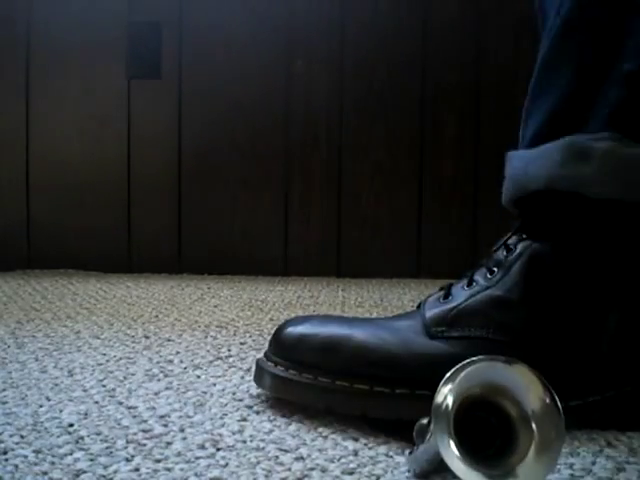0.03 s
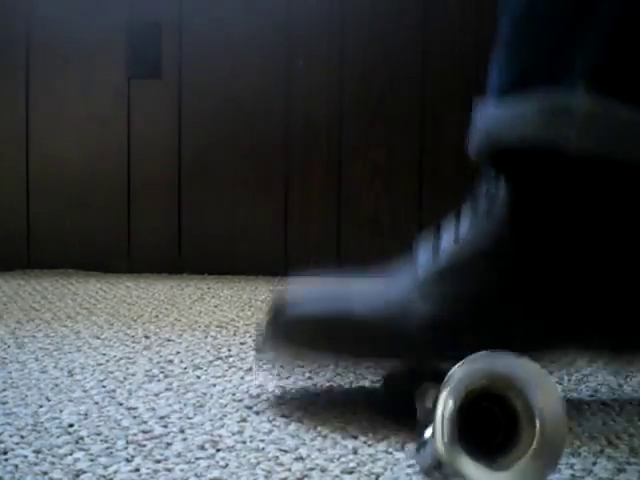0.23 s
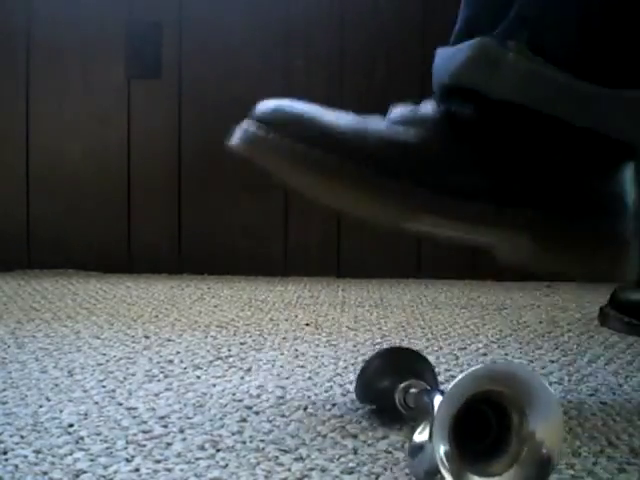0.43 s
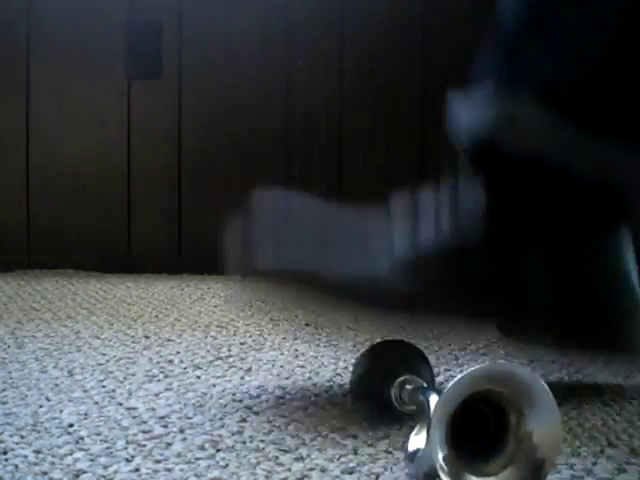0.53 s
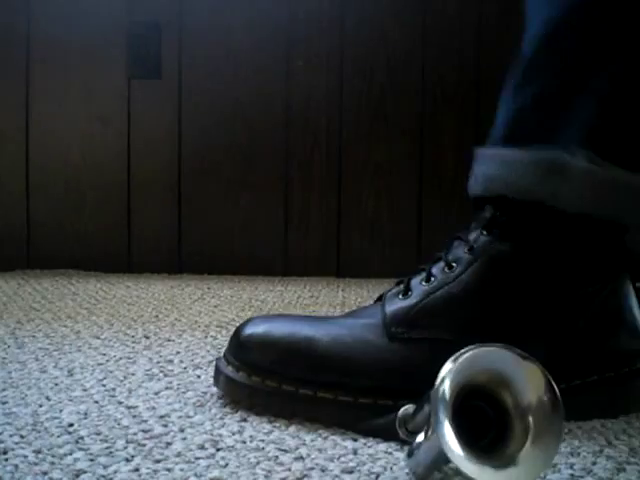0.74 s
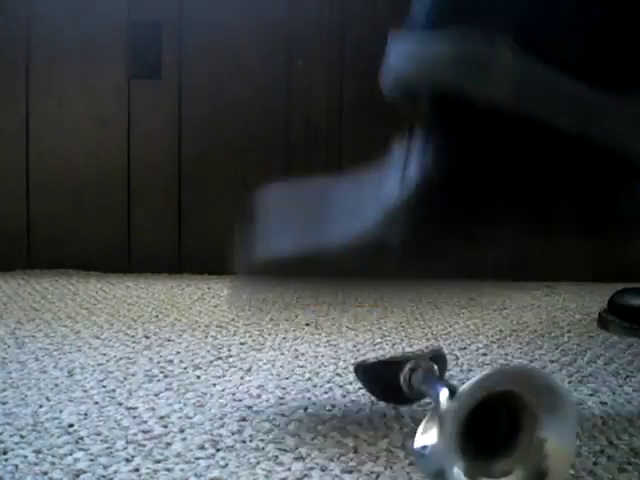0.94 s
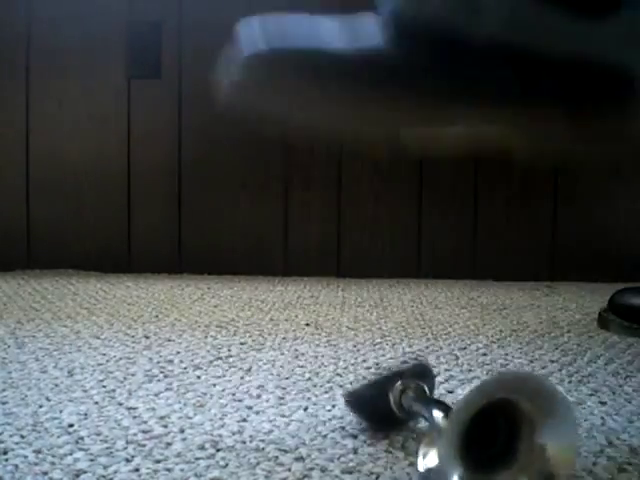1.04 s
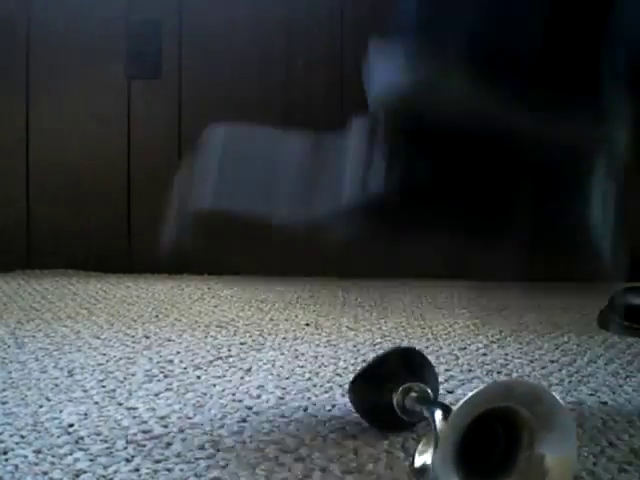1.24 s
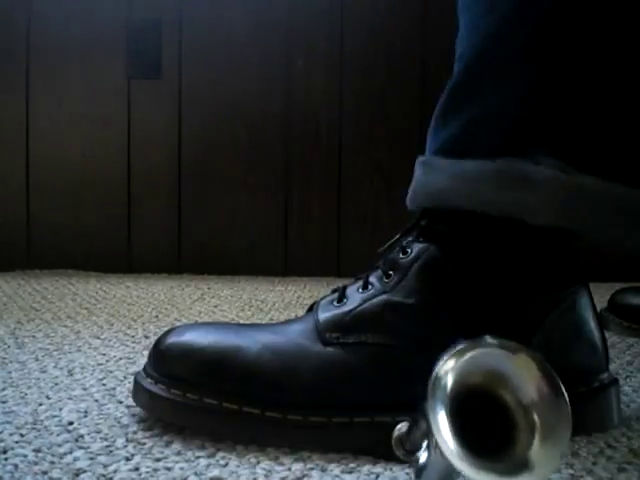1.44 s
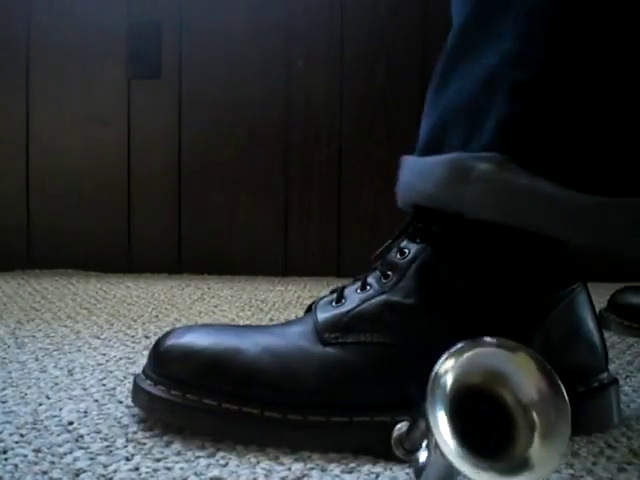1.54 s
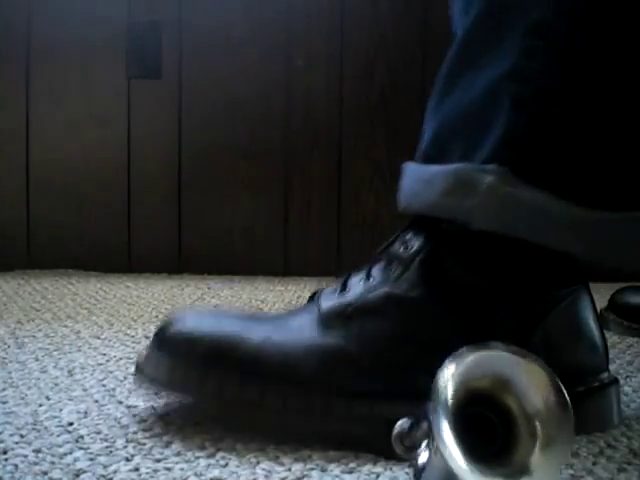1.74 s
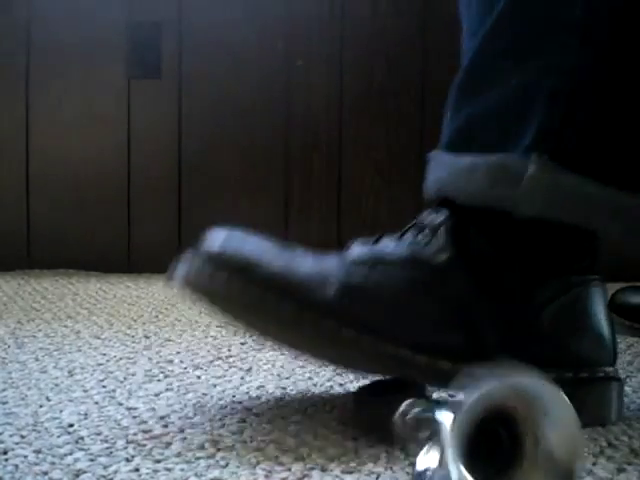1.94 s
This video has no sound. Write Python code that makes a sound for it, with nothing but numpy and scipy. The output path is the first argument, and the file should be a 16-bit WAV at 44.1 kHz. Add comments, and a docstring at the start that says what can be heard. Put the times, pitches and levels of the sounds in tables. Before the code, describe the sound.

Close by in a small room, a bulb horn gives two short honks as a boot lifts off it. Each honk is followed by a soft stamp on carpet and hissing air, the first with a squawk. The boot then knocks twice.

```python
"""A light tap, then a rubber bulb horn honks twice, pumped by a boot on the carpet of a small room.
Each time the boot lifts, the bulb refills and sounds the reed; the honks ring on in the room.
Each of two stamps chokes the reed: a tap, a thump and a hiss of air, the first ending in a squawk.
Trousers rustle, and the boot knocks twice as it settles."""
import sys
import numpy as np
from scipy import signal
from scipy.fft import rfft, irfft
from scipy.io import wavfile

SR = 44100
rng = np.random.default_rng(int(sys.argv[2]) if len(sys.argv) > 2 else 0)


def put_to_file(sound):
    """Save the sound as 16-bit audio at rate SR, in the file named by the first command-line argument."""
    columns = np.atleast_2d(sound).T  # one column per channel
    safe = np.clip(columns, -1, 1)
    whole_steps = np.round(safe * 32767)
    wavfile.write(sys.argv[1], SR, whole_steps.astype(np.int16))


N = 88200
T = np.arange(N) / SR

# reed notes: t/s, f/Hz, fundamental/dB, octave/dB, overtones/dB
FIRST_HONK = [(.222, 600.8, -63, -107, -75), (.243, 627.5, -13, -29, -45.5), (.248, 621.6, -8, -9.5, -23),
              (.253, 574, -18, -6.5, -14.5), (.302, 574.7, -17, -7.5, -13.5), (.315, 567, -23.5, -9, -29),
              (.338, 572.6, -29, -12.5, -33.5), (.358, 562.8, -33.5, -33, -51.5),
              (.41, 578.4, -65, -43.5, -78)]
SECOND_HONK = [(.884, 602.2, -62.5, -88.5, -71), (.901, 671, -17, -28.5, -38),
               (.9055, 623.4, -9, -11, -23.5), (.910, 569.8, -16, -6.5, -15.5), (.930, 577.2, -23, -9, -25),
               (.937, 585.5, -23, -14.5, -32.5), (.946, 565.9, -21, -8, -26.5),
               (.964, 574.5, -29, -20.5, -48.5), (.995, 565, -54, -47, -73)]
SQUAWK_NOTE = [(.605, 607.7, -40.5, -57.5, -53.5), (.619, 610, -23, -53.5, -55),
               (.629, 596, -13, -23.5, -44), (.643, 583.7, -22, -33.5, -27), (.651, 609.1, -11, -15, -54),
               (.657, 634, -11.5, -14, -21.5), (.661, 553.2, -20, -14, -11),
               (.666, 505.5, -31, -20.5, -21.5), (.68, 520, -44, -46, -53.5)]
# overtone envelopes: f/Hz, level/dB
FIRST_COLOUR = [(1720, -1), (2290, -4), (2870, 1.5), (3440, -8.5), (4020, -12.5), (5000, -10.5),
                (6100, -22), (7100, -9.5), (8100, -26), (9200, -19), (17000, -34)]
SECOND_COLOUR = [(1720, -1.5), (2290, 3.5), (3440, -2), (4020, -5.5), (5600, -7), (7400, -25.5),
                 (17000, -44)]
SQUAWK_COLOUR = [(1700, 2.5), (3000, 5.5), (4500, -4.5), (6000, -3), (9000, -29.5), (17000, -34.5)]
# air puffs, low gusts: f/Hz, level/dB
PUFF_SPECTRUM = [(1200, -16), (2000, -4), (5500, 2.5), (8000, -6), (17000, -13)]
GUST_SPECTRUM = [(20, -5.5), (60, -6), (140, -14), (300, -16.5), (700, -11.5), (2000, -66)]
WAVER_HZ, SHIMMER_HZ, SHIMMER_DB, GUST_DB = 350, 70, .55, -27

def reed(note, colour, air_db, jitter):
    """The reed starts sharp and pure, then locks to the pipe and gains overtones; each opening puffs."""
    times, hz, *levels = np.transpose(note)
    pitch_hz = np.interp(T, times, hz) * (1 + jitter * waver(WAVER_HZ))
    phase = 2 * np.pi * np.cumsum(pitch_hz) / SR
    gate = (T > times[0]) * (T < times[-1])
    fundamental, octave, overtones = (amp(np.interp(T, times, db)) * gate for db in levels)
    buzz = 0
    for k in range(3, 32):
        level_db = read(colour, k * np.median(hz)) + SHIMMER_DB * np.sqrt(k) * waver(SHIMMER_HZ)
        buzz += amp(level_db) * np.sin(k * phase + k * k * np.pi / 10)
    tone = np.sqrt(2) * (fundamental * np.sin(phase) + octave * np.sin(2 * phase))
    puffs = amp(air_db) * unit((1 + np.sin(phase)) * noise(PUFF_SPECTRUM))
    gusts = amp(GUST_DB) * np.sqrt(overtones * octave) * noise(GUST_SPECTRUM)
    return tone + overtones * (unit(buzz) + puffs) + gusts


# reed rasps: t/s, half length/s, level/dB
RASPS = [(.252, 0.0015, -21), (.306, 0.0055, -26), (.908, 0.006, -18), (.941, .008, -31),
         (.661, .004, -17.5)]
# reed resonances: f/Hz, level/dB
RASP_SPECTRUM = [(300, -9.5), (800, -1.5), (1500, -6.5), (2000, 13), (2600, -7), (3050, 11), (4000, -5),
                 (5300, 3.5), (8000, -17.5), (18000, -22)]

def rasp(at_s, half_s, db):
    """The reed flutters irregularly as it catches or lets go."""
    return amp(db) * np.exp(-((T - at_s) / half_s) ** 2) * noise(RASP_SPECTRUM)


# faint toots: t/s, half length/s, level/dB
TOOTS = [(1.36, .0051, -35.5), (1.956, .018, -39.5)]

def toot(at_s, half_s, db, hz=595):
    """The bulb shifts; a little air barely sounds the reed."""
    return amp(db) * np.exp(-((T - at_s) / half_s) ** 2) * np.sqrt(2) * np.sin(2 * np.pi * hz * T)


# stamps: t/s, rise/s, hold until/s, release/s, level/dB
HISSES = [(0.589, 0.018, .645, 0.019, -11.5), (1.308, .012, 1.349, 0.022, -11.5)]
# escaping air: f/Hz, level/dB
HISS_SPECTRUM = [(2400, -14), (3200, -4), (4000, -8.5), (5200, -1.5), (7500, -6), (10000, -3.5), (12500, 1),
                 (15000, 0.5), (18000, -7.5)]
SAG_DB_PER_S = 58

def hiss(at_s, rise_s, until_s, release_s, db):
    """Air rushes past the choked reed while the bulb flattens."""
    attack = np.clip((T - at_s) / rise_s, 0, 1) ** .89
    release = np.clip(1 - (T - until_s) / release_s, 0, 1) ** 2
    sag_db = SAG_DB_PER_S * since(at_s + rise_s)
    return amp(db - sag_db) * attack * release * noise(HISS_SPECTRUM)


# sole strikes: t/s, level/dB, f/Hz, decay/s, click/dB
SOLE_KNOCKS = [(.175, -21, 886, 0.0016, -32.5), (0.5772, -23.5, 1020, 0.0024, -21),
               (0.6026, -22.5, 208, 0.0031, -18.5), (1.2982, -20, 1000, 0.0015, -18.5),
               (1.3151, -18, 577, 0.0057, -28), (1.3227, -18.5, 258.4, 0.0042, -29),
               (1.685, -35, 914, 0.0013, -44), (1.8162, -13, 655, 0.002, -35),
               (1.9844, -4, 542, 0.0016, -60), (1.9894, -15.5, 315, 0.0039, -54)]
# sole modes: frequency ratio, level/dB, decay ratio
SOLE_MODES = [(.48, -14, 2.42), (1, 8, 0.58), (1.5, -12.5, 0.88)]
# sole click: f/Hz, level/dB
CLICK_SPECTRUM = [(1000, 7.5), (2300, 1), (12000, -15.5), (18000, -19.5)]

def knock(at_s, db, hz, decay_s, click_db, rise_s=.00098):
    """The rubber sole strikes: damped modes without deep bass, and a click."""
    t = since(at_s)
    modes = sum(amp(mode_db) * np.sin(2 * np.pi * hz * f_ratio * t) * np.exp(-t / (decay_s * stretch))
                for f_ratio, mode_db, stretch in SOLE_MODES)
    attack = (1 - np.exp(-t / rise_s)) ** 2
    body = signal.lfilter(*signal.butter(1, hz / 2, "high", fs=SR), attack * modes)
    return 2 * amp(db) * body + click(at_s, click_db, CLICK_SPECTRUM)


# carpet thumps: t/s, level/dB
CARPET_THUMPS = [(0.587, -28), (0.606, -27.5), (1.303, -28), (1.319, -22.5), (1.708, -43), (1.991, -32)]
# dull impact: f/Hz, level/dB
THUMP_SPECTRUM = [(25, -19), (90, -4.5), (160, 8), (280, 8.5), (580, 2), (2000, -17), (6000, -69.5)]

def thump(at_s, db, rise_s=.0046, fall_s=.0076):
    """The boot's weight meets the carpet."""
    envelope = np.exp(-np.maximum((at_s - T) / rise_s, (T - at_s) / fall_s))
    return amp(db) * envelope * noise(THUMP_SPECTRUM)


# jolts: t/s, level/dB
HORN_JOLTS = [(1.3205, -21.5), (1.8166, -27)]
# metal body: f/Hz, level/dB, decay/s
METAL_MODES = [(2034, 0, 0.0026), (3770, -4.5, 0.0024)]

def clink(at_s, db):
    """The boot jolts the horn's metal body; the carpet damps it at once."""
    t = since(at_s)
    return sum(amp(db + mode_db) * np.sin(2 * np.pi * hz * t) * np.exp(-t / decay_s)
               for hz, mode_db, decay_s in METAL_MODES)


# leather ticks: t/s, level/dB
LEATHER_TICKS = [(1.495, -41), (1.696, -47)]
# leather snap: f/Hz, level/dB
TICK_SPECTRUM = [(3000, -19), (8000, -2), (18000, -12)]

def click(at_s, db, spectrum, decay_s=.0015, highpass_hz=500):
    """A snap of leather or sole, too light to carry bass."""
    burst = amp(db) * (T >= at_s) * np.exp(-since(at_s) / decay_s) * noise(spectrum)
    return signal.lfilter(*signal.butter(2, highpass_hz, "high", fs=SR), burst)


# cloth envelope: t/s, level/dB
CLOTH_LEVEL = [(0, -80), (.18, -50.5), (.24, -36.5), (.35, -58.5), (.56, -49.5), (.7, -72), (.85, -66),
               (.89, -44.5), (1, -58.5), (1.13, -54), (1.29, -50), (1.39, -52.5), (1.51, -63.5),
               (1.72, -62.5), (1.77, -42.5), (1.87, -46.5), (2, -41.5)]
# cloth: f/Hz, level/dB
CLOTH_SPECTRUM = [(200, 11), (1500, 1.5), (3500, 4.5), (7000, -2.5), (9500, 0), (12500, 2), (16000, -11)]

def rustle(flicker_db=1.2):
    """Trousers rustle as the leg moves."""
    level_db = np.interp(T, *np.transpose(CLOTH_LEVEL)) + flicker_db * waver(hz=44)
    return amp(level_db) * noise(CLOTH_SPECTRUM)


# bell and pipe resonances: f/Hz, width/Hz, level/dB
BELL_MODES = [(1144, 3, -23), (1133, 3.5, -26), (2872, 2, -19), (3445, 4, -14), (4021, 3.5, -11),
              (5168, 5, -5.5)]

def bell_ring(x):
    """Narrow resonances of the horn's bell and pipe outlast the reed; the close pair beats."""
    tail = 0
    for hz, width_hz, db in BELL_MODES:
        envelope = amp(db) * 2 * np.pi * width_hz / SR * np.exp(-np.pi * width_hz * T)
        tail += envelope * np.cos(2 * np.pi * hz * T)
    return signal.fftconvolve(x, tail)[:N]


# reverberation time: f/Hz, T60/s
REVERB_T60 = [(600, 0.42), (1150, 0.5), (3000, 0.48), (6000, 0.3)]
# reverberation: f/Hz, level/dB
REVERB_SPECTRUM = [(200, -29), (600, -18), (3000, -19.5), (5500, -18), (8000, -27), (16000, -33.5)]

def reverb(x, onset_s=.016):
    """The room's weak diffuse tail; each band dies at its own rate."""
    hz, t, bands = signal.stft(rng.standard_normal(SR), SR, nperseg=256)
    decay_per_s = np.log(1000) / read(REVERB_T60, hz)[:, None]
    gain = amp(read(REVERB_SPECTRUM, hz))[:, None] * np.sqrt(2 * decay_per_s / SR)
    tail = signal.istft(bands * gain * np.exp(-decay_per_s * t), SR, nperseg=256)[1][:SR]
    return signal.fftconvolve(x, tail * np.minimum(T[:SR] / onset_s, 1))[:N]


# room tone, fading room ring: f/Hz, level/dB
FLOOR_SPECTRUM = [(130, -2.5), (220, -13.5), (400, -11.5), (650, -23.5), (950, -17), (1220, -7),
                  (1600, -25), (5500, -22), (18000, -49.5)]
LINGER_SPECTRUM = [(300, -31), (480, -10.5), (600, 5.5), (750, -28), (1150, -1), (1500, -16.5), (2900, -10),
                   (5500, -19.5), (9000, -37.5)]
FLOOR_DB, LINGER_DB, LINGER_DB_PER_S = -53.5, -46, -19

def room_tone():
    """Steady room noise under a faint ring that fades from the start."""
    floor = amp(FLOOR_DB) * noise(FLOOR_SPECTRUM)
    return floor + amp(LINGER_DB + LINGER_DB_PER_S * T) * noise(LINGER_SPECTRUM)


def amp(db):
    """dB to gain."""
    return 10 ** (np.asarray(db) / 20)


def unit(x):
    """Scale to rms 1."""
    return x / np.sqrt(np.mean(x ** 2) + 1e-20)


def since(at_s):
    """Seconds after at_s; 0 before."""
    return np.maximum(T - at_s, 0)


def read(points, hz):
    """Interpolate over log frequency."""
    f, value = np.transpose(points)
    return np.interp(np.log(hz + 1), np.log(f + 1), value)


def noise(spectrum):
    """Coloured noise, rms 1."""
    gain = amp(read(spectrum, np.fft.rfftfreq(N, 1 / SR)))
    return unit(irfft(rfft(rng.standard_normal(N)) * gain, N))


def waver(hz):
    """Random motion slower than hz, rms 1."""
    rolloff = 1 + (np.fft.rfftfreq(N, 1 / SR) / hz) ** 4
    return unit(irfft(rfft(rng.standard_normal(N)) / rolloff, N))


def scene():
    """Horn and boot, close by in the room; mono."""
    horn = reed(FIRST_HONK, FIRST_COLOUR, air_db=-18, jitter=.002)
    horn += reed(SECOND_HONK, SECOND_COLOUR, air_db=-9.5, jitter=.007)
    horn += reed(SQUAWK_NOTE, SQUAWK_COLOUR, air_db=-15.5, jitter=.00798)
    air = sum(hiss(*row) for row in HISSES)
    air += sum(toot(*row) for row in TOOTS)
    air += sum(rasp(*row) for row in RASPS)
    boot = sum(knock(*row) for row in SOLE_KNOCKS)
    boot += sum(thump(*row) for row in CARPET_THUMPS)
    boot += sum(click(*row, TICK_SPECTRUM) for row in LEATHER_TICKS)
    direct = horn + air + boot + sum(clink(*row) for row in HORN_JOLTS)
    return (direct + bell_ring(horn) + reverb(direct) + rustle() + room_tone())[None]


LOWPASS_HZ = 18400

def record(dry):
    """Soft limit near full scale, then low-pass."""
    limited = dry / (1 + dry ** 8) ** (1 / 8)
    lowpass = signal.firwin(511, LOWPASS_HZ, window=("kaiser", 9), fs=SR)
    return signal.oaconvolve(limited, lowpass[None], "same")


dry = scene()
out = record(dry)
put_to_file(out)
```